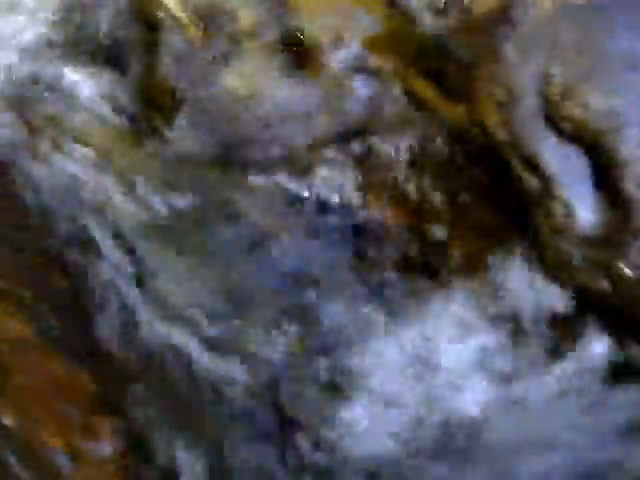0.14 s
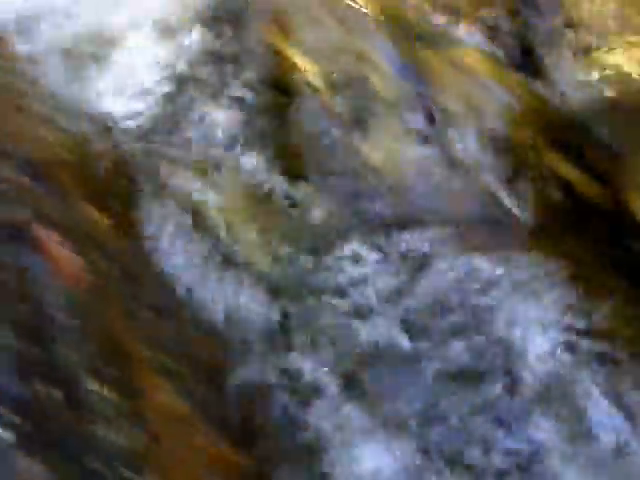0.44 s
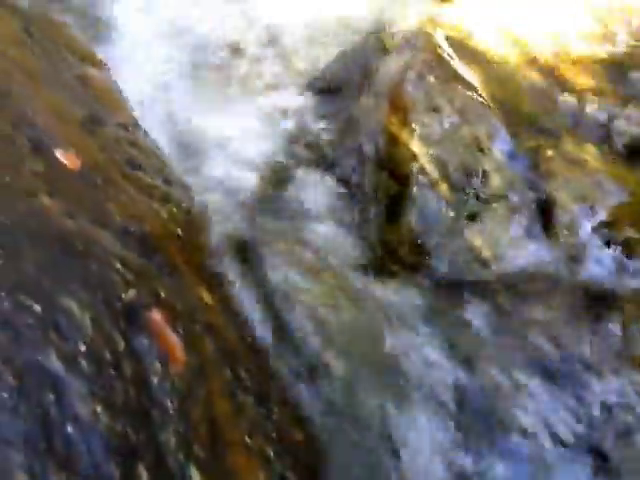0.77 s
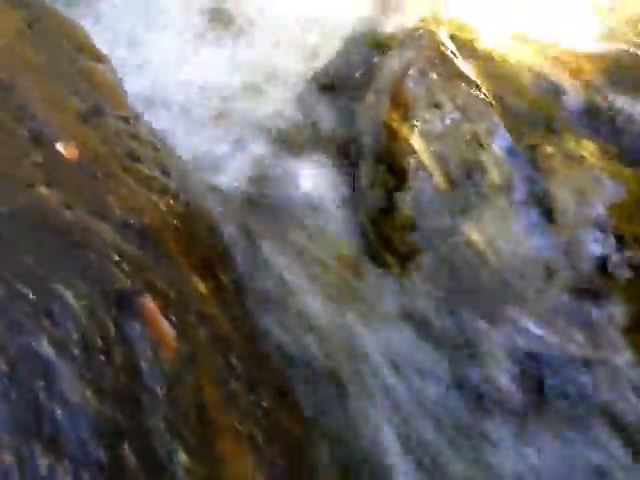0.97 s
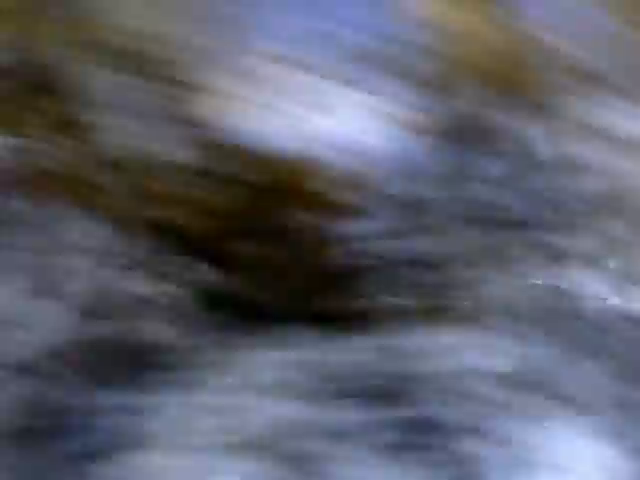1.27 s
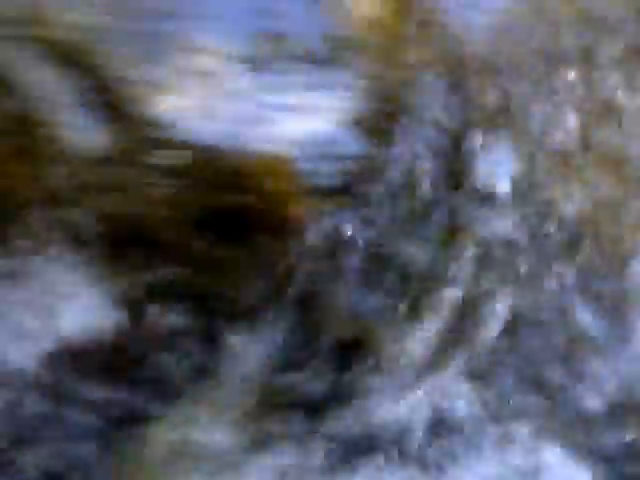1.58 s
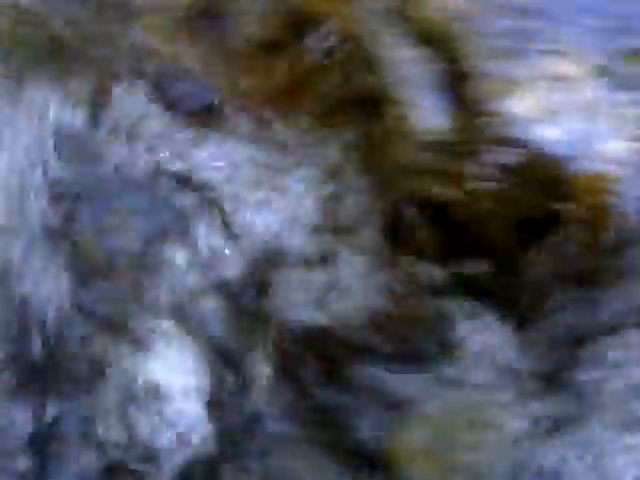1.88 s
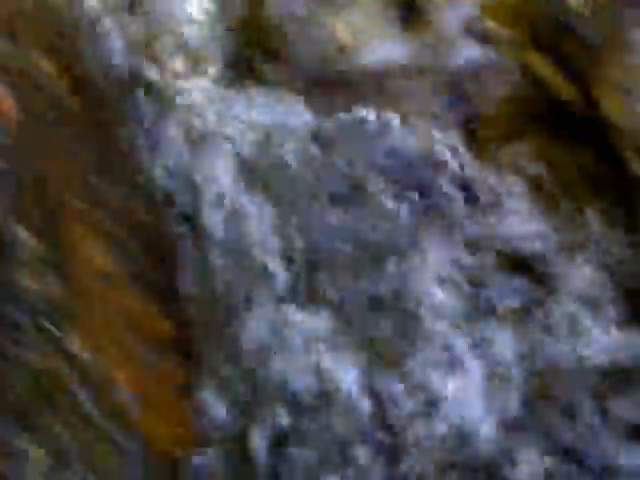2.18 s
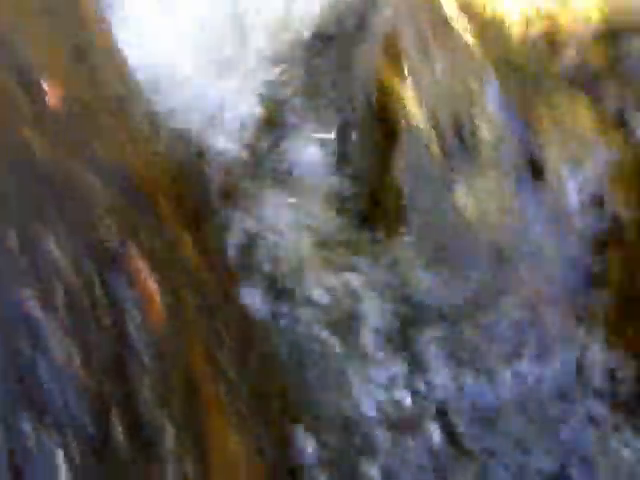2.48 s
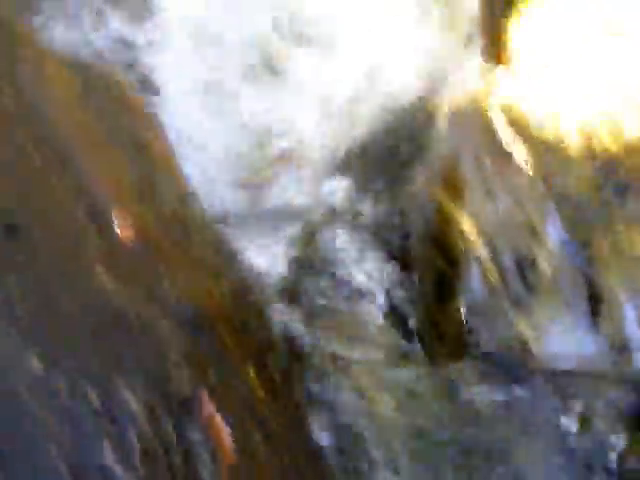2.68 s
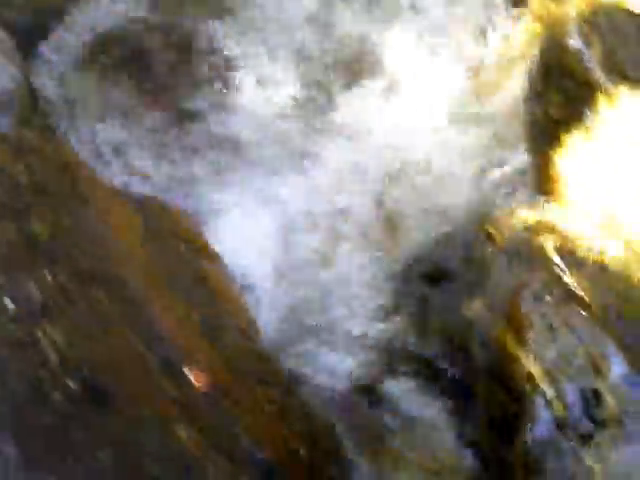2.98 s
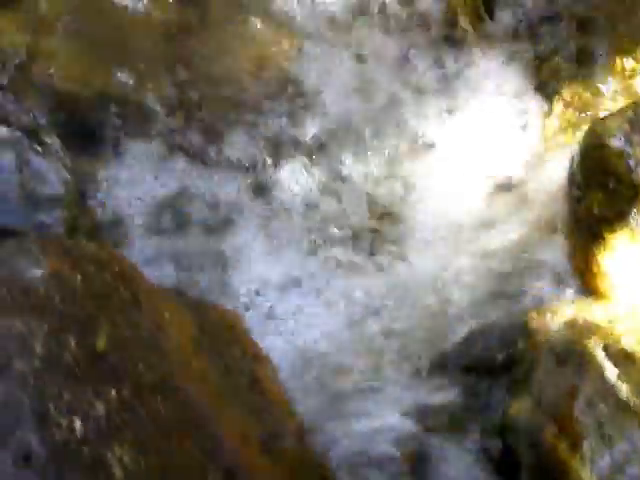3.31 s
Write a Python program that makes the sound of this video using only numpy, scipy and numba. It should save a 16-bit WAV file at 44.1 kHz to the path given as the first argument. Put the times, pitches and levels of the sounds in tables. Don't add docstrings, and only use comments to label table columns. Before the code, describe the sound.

Stream water tumbling over rocks, with deep hollow gulps, plops and bright plinks throughout

```python
import sys
import numpy as np
from scipy import signal
from scipy.fft import rfft, irfft, next_fast_len
from scipy.io import wavfile
from scipy.ndimage import uniform_filter1d, map_coordinates
from numba import njit

SR = 44100
rng = np.random.default_rng(int(sys.argv[2]) if len(sys.argv) > 2 else 0)


def volts_from_decibels(level):
    exponent = np.asarray(level, float) / 20
    return 10 ** exponent


def dump(signal):
    limited = np.clip(np.atleast_2d(signal).T, -1, 1)
    pcm = np.round(limited * 32767).astype(np.int16)
    wavfile.write(sys.argv[1], SR, pcm)


N = 152145


def unit(x):
    return x / np.sqrt(np.mean(x ** 2) + 1e-20)


def along(points, hz):
    f, v = np.transpose(points)
    return np.interp(np.log(hz + 1), np.log(f + 1), v)


def closed(points, hz):
    return volts_from_decibels(along(points, hz)) * (hz > points[0][0]) * (hz < points[-1][0])


def wobble(rate):
    knots = rng.standard_normal(int(N * rate / SR) + 4)
    return map_coordinates(knots, [np.arange(N) * rate / SR])


def filtered(x, gain):
    m = 2 * next_fast_len(N // 2 + 8192)
    cepstrum = irfft(np.log(gain(np.fft.rfftfreq(m, 1 / SR)) + 1e-6), m)
    cepstrum[1:m // 2] *= 2
    cepstrum[m // 2 + 1:] = 0
    return irfft(rfft(x, m) * np.exp(rfft(cepstrum)), m)[..., :N]


def microphone_hiss():
    # frequency in Hz, hiss level in dB per Hz.
    hiss_curve = [(20, 8.5), (100, 5), (1000, 6.5), (6500, -1.5), (7700, -7.5), (8500, -1.5), (15500, -3)]
    hiss_db, level_waver_db = -57.5, 0.3
    hiss = unit(filtered(rng.standard_normal((2, N)), lambda hz: volts_from_decibels(along(hiss_curve, hz))))
    return volts_from_decibels(hiss_db + level_waver_db * wobble(17)) * hiss


def electronic_whine():
    whine_hz, whine_db = 15721, -93
    return volts_from_decibels(whine_db) * np.sin(2 * np.pi * whine_hz * np.arange(N) / SR)


@njit
def ring(rows, n, sr):
    out = np.zeros((2, n))
    for s, gain, hz, life, swell, rise, side in rows:
        start = int(s * sr)
        for i in range(max(0, -start), min(int(5 * life * sr / hz), n - start)):
            c = i * hz / sr
            envelope = (1 - np.exp(-(c / swell) ** 2)) * np.exp(-c / life)
            v = gain * envelope * np.sin(2 * np.pi * c * (1 + rise * c / (2 * life)))
            out[0, start + i] += v
            out[1, start + i] += side * v
    return out


def churn():
    patch_db = 0.7
    z = signal.stft(rng.standard_normal((2, N)), nperseg=256)[2]
    field = uniform_filter1d(rng.standard_normal(z.shape[1:]), size=4, axis=0)
    field = uniform_filter1d(field, size=10, axis=1)
    patchy = z * volts_from_decibels(patch_db * unit(field))
    return unit(signal.istft(patchy, nperseg=256)[1][:, :N])


def single_bubbles():
    # heard at in seconds, peak in dB, pitch in Hz, life as a multiple of the usual.
    gulps = [(0.088, -14.5, 395, 1.7), (0.236, -16, 458, 8.9), (0.318, -21.5, 413, 6.3),
             (0.514, -18, 411, 4.5), (0.556, -22, 465, 4.6), (0.649, -15, 402, 2.1), (0.76, -13, 401, 4.8),
             (0.818, -14, 482, 1.6), (1.015, -13.5, 447.6, 5.5), (1.071, -18.5, 426, 7.9),
             (1.25, -11, 472, 2), (1.272, -13.5, 441, 5.4), (1.455, -19, 442.6, 10),
             (1.523, -11.5, 461, 3.2), (1.588, -15.5, 421, 2.9), (1.706, -12, 456, 4.5),
             (1.754, -14, 417, 5), (1.824, -20.5, 415, 4.6), (2.149, -16, 393, 6), (2.228, -11, 421, 2.36),
             (2.296, -24, 555, 3.5), (2.368, -21.5, 385, 7.4), (2.557, -14, 491, 4), (2.626, -13, 456, 3.5),
             (2.65, -24, 406, 11), (2.71, -19, 394, 5.1), (2.922, -36, 430, 0.81), (2.988, -15, 407, 7.3),
             (3.12, -13, 505, 7.7), (3.246, -16.5, 375, 1.8)]
    # heard at in seconds, peak in dB, pitch in Hz.
    plops = [(0.202, -13, 866), (0.341, -15.5, 770), (0.622, -12, 752), (0.653, -9.5, 679),
             (0.706, -18, 768), (0.817, -16, 818), (1.179, -14, 792), (1.305, -12.5, 694),
             (1.464, -12.5, 761), (1.539, -17, 792), (1.599, -14, 700), (1.821, -11.5, 642),
             (1.972, -14.5, 738), (2.081, -15, 880), (2.258, -13, 730), (2.295, -11, 700),
             (2.322, -8.5, 759), (2.389, -15, 885), (2.453, -16, 747), (2.888, -34, 725),
             (2.924, -10.5, 680), (3.021, -11.5, 790), (3.086, -11, 799), (3.248, -22, 785)]
    # [s, dB, Hz].
    plinks = [(0.3142, -7, 1540), (0.5658, -16, 1630), (0.5851, -6.5, 1570), (0.8357, -12, 1490),
              (1.1747, -10.5, 1440), (1.4663, -14.5, 1410), (1.745, -8, 1520), (1.912, -9, 1490),
              (2.0065, -9, 1516), (2.2025, -9, 1550), (2.2692, -11.5, 1590), (2.3481, -5.5, 1560),
              (2.378, -11, 1660), (3.1207, -7, 1710), (3.3458, -10, 1640)]
    # [s, dB, Hz].
    drips = [
        (0.609, -38, 1950),
        (1.0944, -21.5, 1990),
        (1.4282, -29.5, 2150),
        (2.1026, -25, 1980),
        (2.145, -42, 2030),
        (2.2588, -27, 1970),
        (3.0949, -30, 2000),
    ]
    # [s, dB, Hz].
    spits = [(0.0184, -34, 3130), (0.0968, -24.5, 3130), (0.581, -26, 2670), (0.755, -38, 2830),
             (0.9955, -27, 3320), (1.0934, -27, 2700), (1.3498, -42, 2860), (1.3763, -27, 3200),
             (1.468, -26, 3200), (1.611, -26.5, 3340), (1.7105, -37, 3100), (2.5247, -26, 2960),
             (2.5607, -25, 3070), (2.582, -25, 3200), (2.896, -29, 3300)]
    # [s, dB, Hz].
    spray = [(.098, -51, 6390), (.204, -57, 6020), (.699, -54, 6000), (.765, -52, 8700), (1.45, -50, 6400),
             (1.628, -51, 6170), (1.762, -42.5, 6000), (1.799, -49, 6600), (1.7995, -50, 8250),
             (2.347, -49, 6450), (2.711, -49, 6340)]
    # [s, dB, Hz].
    thuds = [
        (.292, -37, 172),
        (1.04, -33, 256),
        (1.12, -34.5, 247),
        (1.19, -37, 278),
        (1.315, -33.5, 254),
        (2.469, -37.5, 278),
        (2.53, -45, 171),
        (2.672, -46, 172),
        (2.765, -41, 240),
        (2.953, -41.5, 156),
    ]
    # [s, dB, Hz].
    gurgles = [(0.053, -22, 425), (0.121, -16, 424), (0.174, -20, 482), (0.201, -20, 552),
               (0.275, -25.5, 388), (0.338, -17, 432), (0.387, -31, 434), (0.599, -18, 402),
               (0.935, -22, 366), (0.994, -24, 428), (1.413, -20.5, 567), (1.47, -13.5, 446),
               (1.782, -18, 483), (1.952, -29, 367), (2.045, -20, 425), (2.338, -19, 447),
               (2.416, -19.5, 379), (2.48, -14.5, 494), (2.603, -20, 472), (2.858, -18, 428),
               (3.068, -20, 443), (3.39, -19, 390), (3.428, -19.5, 534)]
    # [s, dB, Hz].
    further_plops = [(0.02, -9.5, 730), (0.065, -34, 735), (0.091, -16, 840), (0.137, -18, 710), (0.179, -15, 670),
                     (0.238, -12, 834), (0.285, -20, 780), (0.36, -13.5, 776), (0.466, -19.5, 670),
                     (0.537, -27, 762), (0.55, -12, 730), (0.562, -10.5, 788), (0.588, -26, 725), (0.609, -25, 733),
                     (0.795, -27, 830), (0.832, -11.5, 736), (0.871, -16.5, 666), (0.916, -17, 786),
                     (0.939, -27.5, 700), (1.013, -18, 810), (1.117, -13.5, 700), (1.73, -17, 660),
                     (1.998, -12, 772), (2.137, -13.5, 740), (2.176, -23, 666), (2.587, -16, 755), (2.712, -13, 697),
                     (2.971, -19, 714), (3.269, -16.5, 790), (3.397, -14.5, 645), (3.423, -15, 785)]
    # [s, dB, Hz].
    ticks = [(0.0962, -50, 3860), (0.1281, -44, 3990), (0.4035, -50, 4210), (0.5866, -51, 4230),
             (0.6554, -52, 4030), (0.6943, -48, 4280), (0.8135, -45, 4250), (0.9522, -48, 4550),
             (1.3009, -45, 4060), (1.5404, -42, 4100), (1.5609, -39, 4300), (1.7325, -52, 3990),
             (1.8856, -43, 4020), (1.9829, -40, 4240), (2.0183, -52, 4150), (2.367, -47, 4100),
             (2.6713, -50, 4200), (2.7087, -44, 4240), (2.9856, -44, 4300), (3.3278, -47, 4190)]

    # table, level over it in dB, cycles of life, cycles of swell
    kinds = [(gulps, -1.9, 0.99, 1.82), (plops, -2.6, 4.11, 0.73), (plinks, -13.5, 5.5, 2.2),
             (drips, -1, 4.5, 2.2), (spits, -7, 4.5, 0.57), (spray, 3, 3, 1.6), (thuds, 2.5, 1.6, 0.8),
             (gurgles, -3, 4.28, 1.75), (further_plops, -4.5, 4.15, 1.235), (ticks, -2.5, 3.2, 1.2)]
    lead = 0.597
    largest_rise, full_rise_hz = 0.13, 600
    place_spread, low_edge_hz = 0.78, 234

    rows = []
    c = np.linspace(0, 20, num=200)
    for table, over_db, life, swell in kinds:
        places = place_spread * rng.standard_normal(len(table))
        for (s, db, hz, *longer), place in zip(table, places):
            cycles = life * np.prod(longer)
            rise = largest_rise * min(1, full_rise_hz / hz)
            peak = np.max((1 - np.exp(-(c / swell) ** 2)) * np.exp(-c / cycles))
            start = s - lead * swell / hz
            rows.append((start, volts_from_decibels(db + over_db) / peak, hz * (1 - rise), cycles, swell, rise, place))
    bubbles = ring(np.array(rows, float), N, SR)
    return filtered(bubbles, lambda hz: 1 / np.sqrt(1 + (low_edge_hz / (hz + 1)) ** 8))


def swarm(count):
    low_hz, high_hz = 221.87, 9013
    spread_db, cap_db = 1, 6
    life_cycles, swell_cycles, rise = 6.68, 1.28, 0.08
    u, normal = rng.random((count, 3)), rng.standard_normal((count, 2))
    start = u[:, 0] * N / SR
    hz = low_hz * (high_hz / low_hz) ** u[:, 1]
    louder_db = -spread_db * np.log(1 - u[:, 2])
    gain = hz * volts_from_decibels(cap_db * np.tanh(louder_db / cap_db))
    life = life_cycles * np.exp(0.25 * normal[:, 1])
    one = np.ones(count)
    return unit(ring(np.c_[start, gain, hz, life, swell_cycles * one, rise * one, normal[:, 0]], N, SR))


def rapids():
    # time in seconds, strength of the flow in dB.
    flow = [(0, -34.5), (.2, -33.5), (.4, -34), (.55, -35), (.7, -34.5), (.9, -34.5), (1.1, -35),
            (1.3, -34), (1.4, -35), (1.65, -34.5), (1.85, -34), (2, -34), (2.15, -34), (2.4, -34.5),
            (2.75, -34.5), (3.1, -35.5), (3.45, -34.5)]
    # frequency in Hz, power share of bubbles against plain turbulence [0 to 1].
    bubble_share = [(800, .85), (1500, .55), (3000, .3), (7000, .4)]
    # frequency in Hz, gain in dB per Hz.
    cavity = [(65, -94), (110, -40.5), (205, -32), (280, -18), (421, -1.5), (601, -9), (783, -3),
              (1250, -22), (1620, -41), (2750, -120)]
    # frequency in Hz, gain in dB per Hz.
    walls = [(680, -27), (1150, -49), (1290, -11), (1550, 0), (2300, -19.5), (3350, -21.5), (3700, -35),
             (5070, -57), (8580, -120)]
    # frequency in Hz, gain in dB per Hz.
    port = [(2180, -27), (3700, -4), (4340, 1.5), (4970, -5.5), (6030, -5), (7600, -14), (9880, -44),
            (16700, -120)]
    walls_db, port_db = -11.5, -45
    surge_db, fast_surge_db = 0.2, 0.9
    water_db = 9.5

    def housing(hz):
        return closed(cavity, hz) + volts_from_decibels(walls_db) * closed(walls, hz) + volts_from_decibels(port_db) * closed(port, hz)

    s, level_db = np.transpose(flow)
    flow_db = np.interp(np.arange(N) / SR, s, level_db)
    flow_db = flow_db + surge_db * wobble(7.97) + fast_surge_db * wobble(24.615)
    bubbles = filtered(swarm(count=11000), lambda hz: np.sqrt(along(bubble_share, hz)))
    turbulence = filtered(churn(), lambda hz: np.sqrt(1 - along(bubble_share, hz)))
    surging = (bubbles + turbulence) * volts_from_decibels(flow_db - flow_db.mean())
    heard = filtered(surging, housing)
    return heard * volts_from_decibels(level_db.mean() + water_db) / heard[0].std()


def scene():
    # frequency in Hz, side over mid in dB.
    stereo_width = [(60, -10), (110, -10), (200, -35), (380, -23), (700, -18), (1290, -13.5), (2380, -6),
                    (4400, -5.5), (8120, 3.5), (15000, -1)]
    mid, side = rapids() + single_bubbles()
    side = filtered(side, lambda hz: volts_from_decibels(along(stereo_width, hz)))
    return np.array([mid + side, mid - side])


def low_pass(x):
    return signal.sosfilt(signal.butter(12, 15840, fs=SR, output="sos"), x)


def record(dry):
    offset = -0.003
    mix = dry + microphone_hiss() + electronic_whine() + offset
    return low_pass(mix)


dry = scene()
out = record(dry)
dump(out)
```